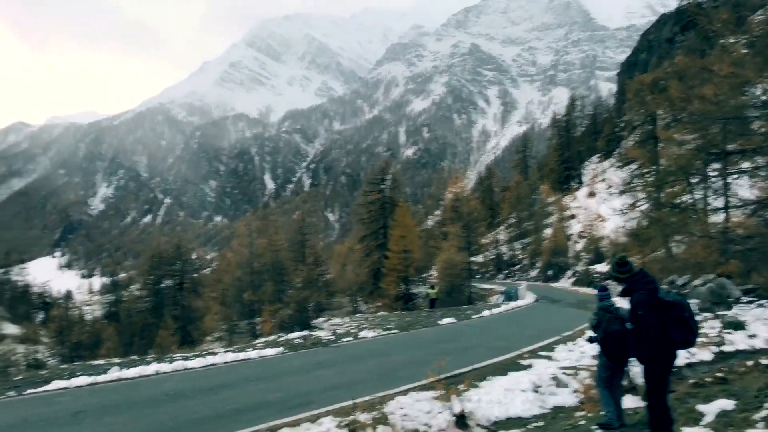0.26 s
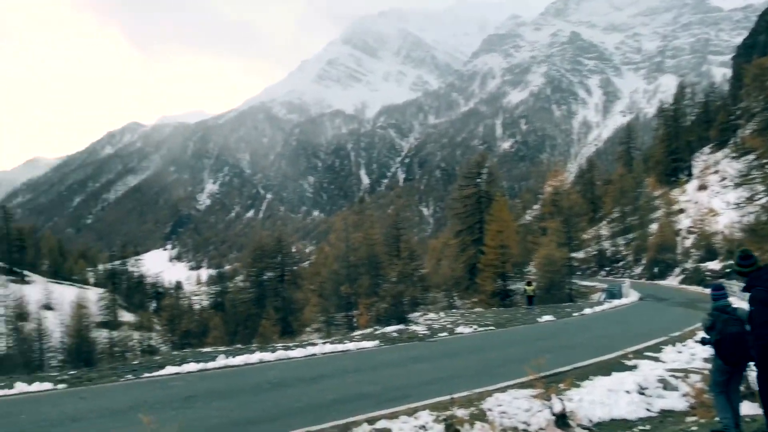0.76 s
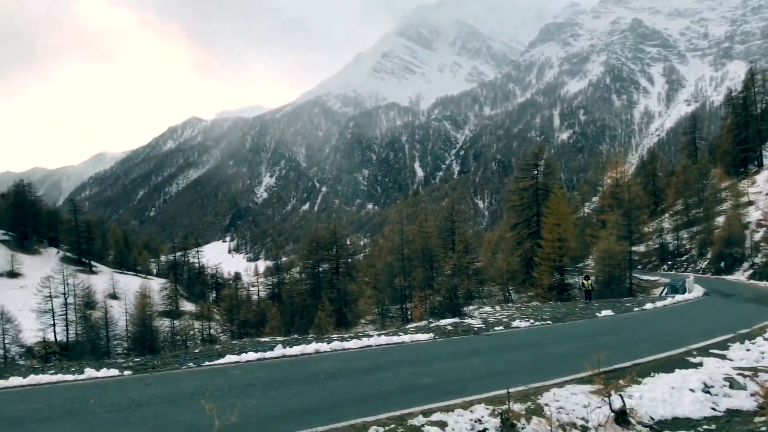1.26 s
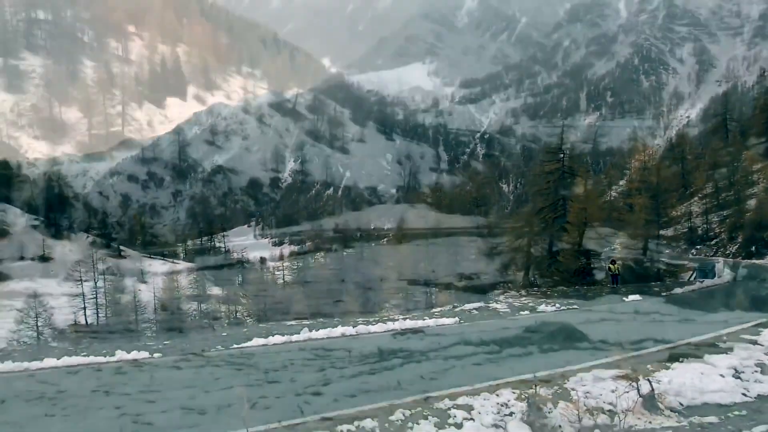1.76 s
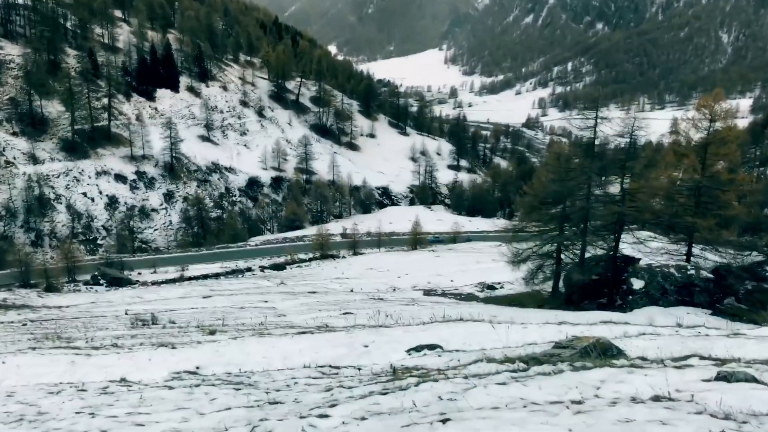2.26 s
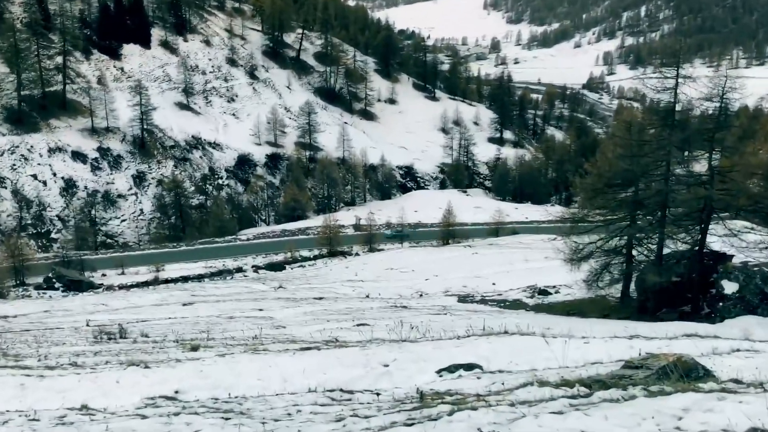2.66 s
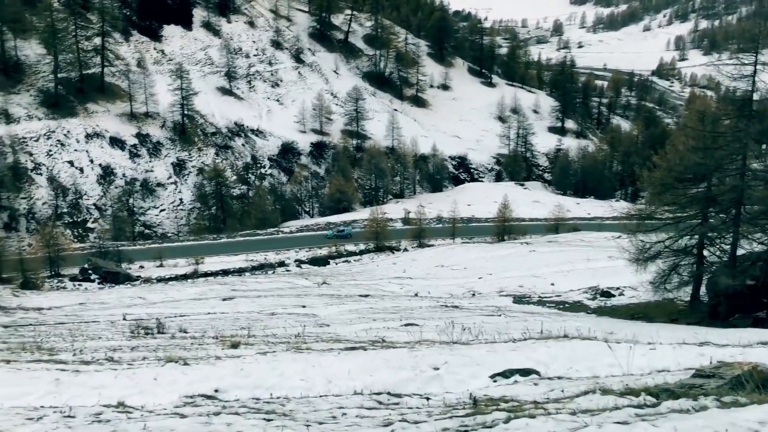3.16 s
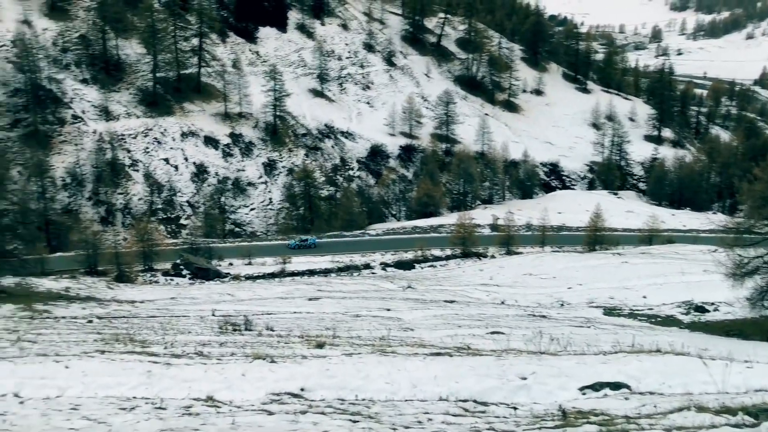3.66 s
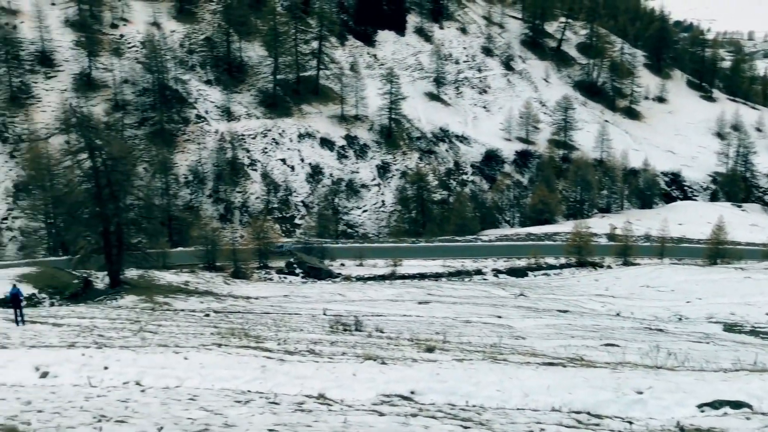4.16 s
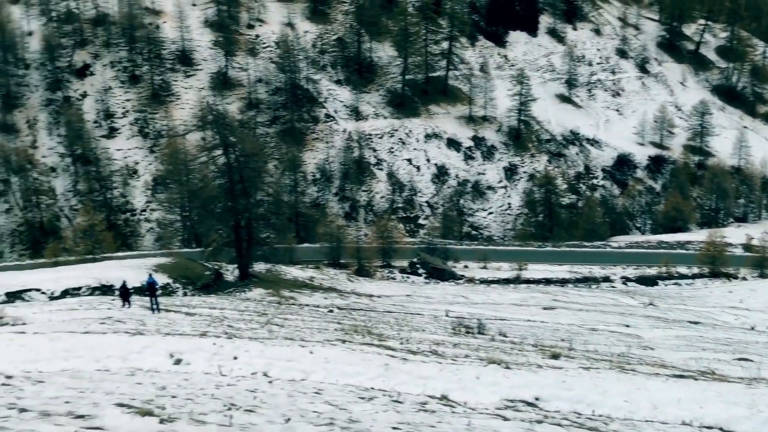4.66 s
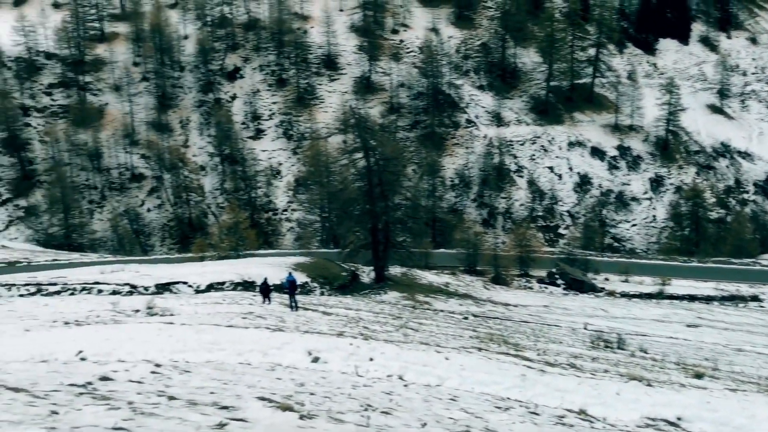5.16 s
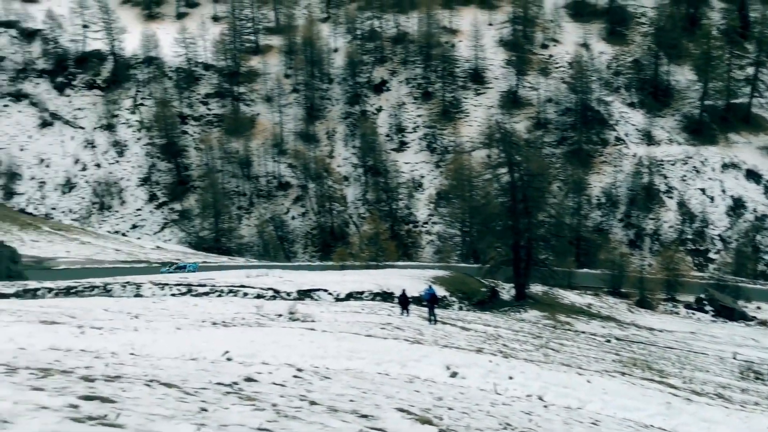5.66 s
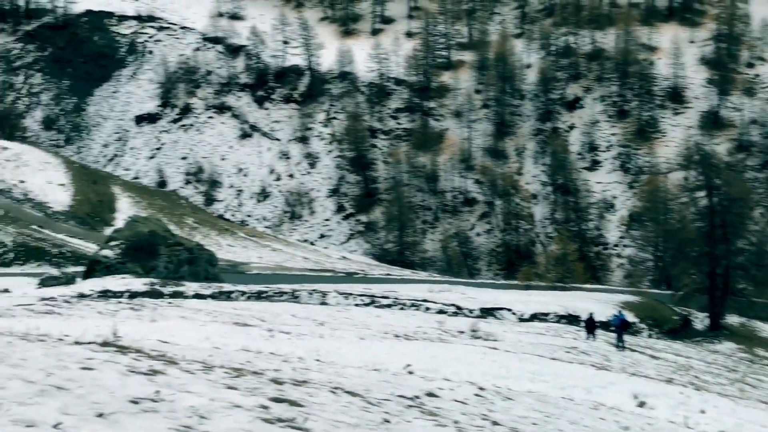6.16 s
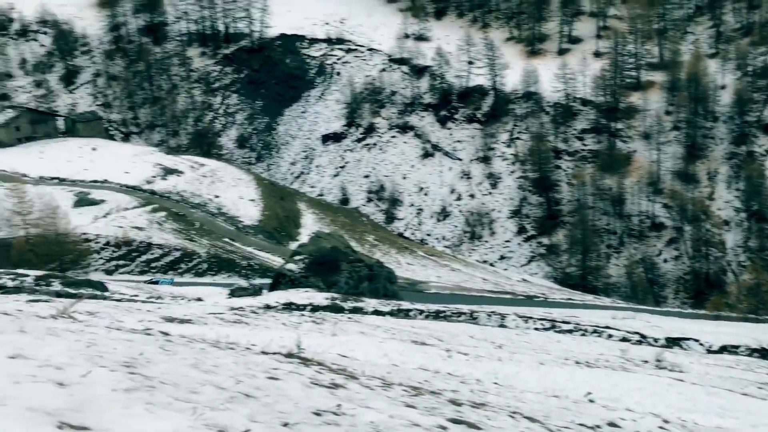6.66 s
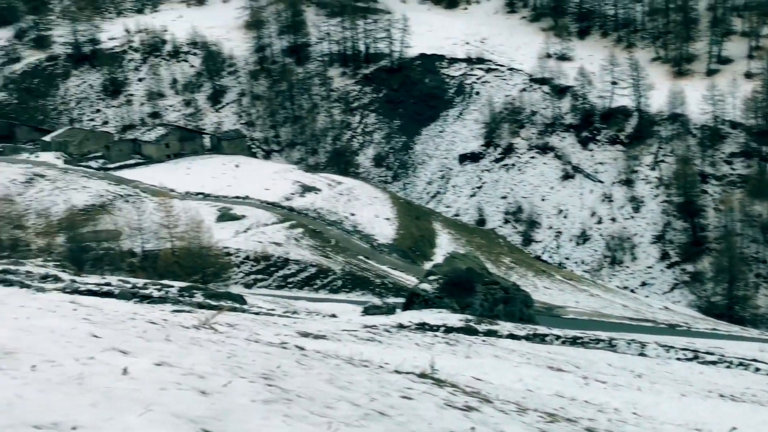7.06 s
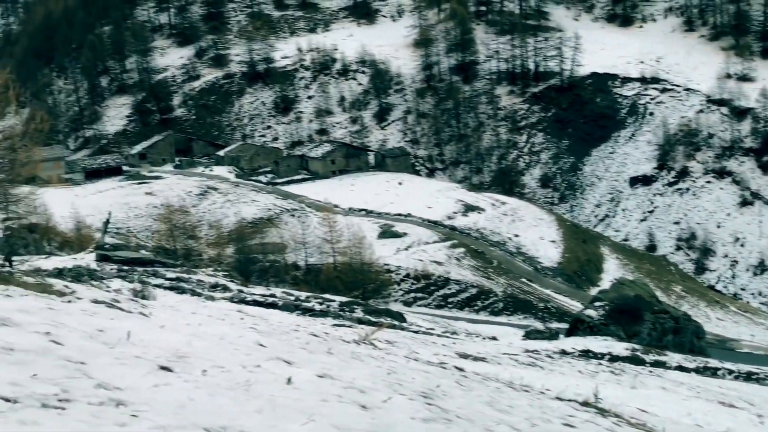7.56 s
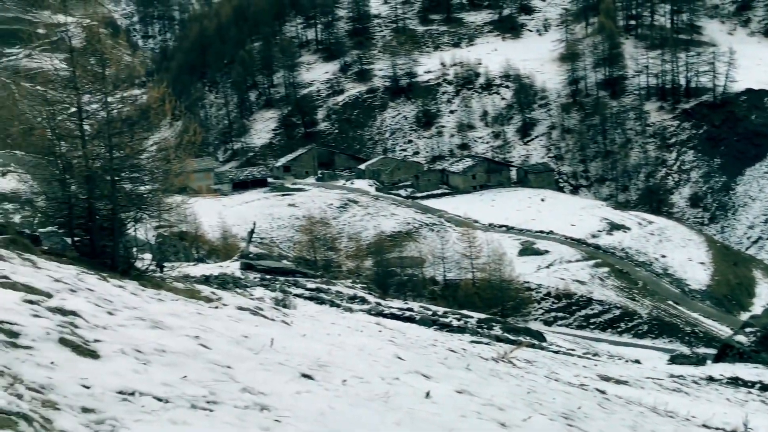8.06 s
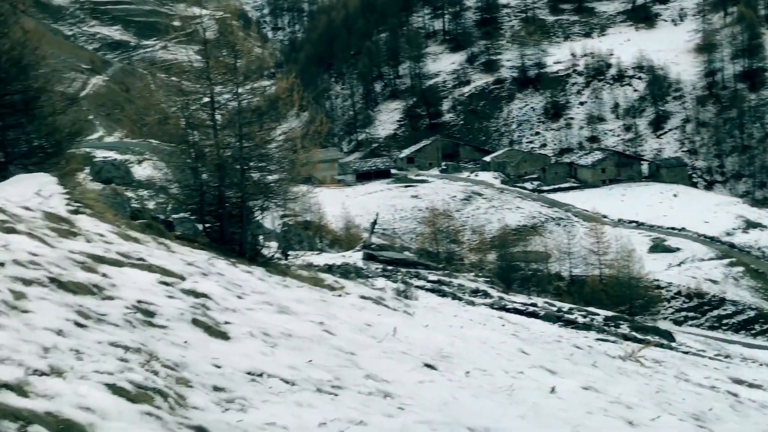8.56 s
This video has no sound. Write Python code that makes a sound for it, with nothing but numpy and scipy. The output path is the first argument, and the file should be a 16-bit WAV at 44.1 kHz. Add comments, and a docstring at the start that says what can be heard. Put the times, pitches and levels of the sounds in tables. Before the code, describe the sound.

A rally car is heard at high revs across an open mountain valley. Right at the start it shifts up with a thumping backfire and a quick drop in pitch. The raspy, buzzing note then climbs slowly at full throttle until about 6 seconds, loudest in the first two seconds, dipping, then swelling again around 4. The slopes return a blurred echo throughout, with brief clearer reflections near 5.6 and 6.7 seconds. From about 4.5 seconds come short, bright bursts of gritty crackle, and the exhaust stutters and cracks between 6 and 8. Near 6.9 seconds the pitch steps down, then keeps sinking as the car draws away until the end, just before 9. Close by, soft low foot thuds fall around 3, 7 and 8 seconds, and cloth faintly swishes from 5.5 on. A low wind rumbles underneath.

```python
"""A rally car rasps across a snowy mountain valley at full throttle, shifts up with a backfire,
then lifts off and draws away. Its note is a stack of firing orders with pulsing exhaust hiss on top.
The slopes return that note blurred and mostly lower in pitch, and single rock faces answer clearly.
Short bright bursts of gritty crackle come late on; cloth rustles and feet thud, over a low wind."""
import sys
import numpy as np
from scipy import signal
from scipy.io import wavfile
from scipy.ndimage import uniform_filter1d

SR = 44100
rng = np.random.default_rng(int(sys.argv[2]) if len(sys.argv) > 2 else 0)


def put_to_file(sound):
    """Save the sound as 16-bit audio at rate SR, in the file named by the first command-line argument."""
    columns = np.atleast_2d(sound).T  # one column per channel
    safe = np.clip(columns, -1, 1)
    whole_steps = np.round(safe * 32767)
    wavfile.write(sys.argv[1], SR, whole_steps.astype(np.int16))


N = 388080

# firing rate as heard, with one early and one late gear change: time_s, pitch_hz
FIRING_RATE = [(0.0, 234.0), (0.12, 229.2), (0.16, 198.2), (1.32, 213.5), (2.01, 222.2), (2.56, 225.5),
               (3.66, 237.5), (4.98, 246.1), (5.55, 247.3), (6.29, 247.3), (6.51, 246.1), (6.72, 241.5),
               (6.87, 240.8), (6.91, 209.6), (8.43, 193.7), (8.8, 191.7)]
PIPE_LAG_RAD = 0.12  # order k lags by this times k squared, which blunts each exhaust pulse


def amp(db):
    """Gain for a level in dB."""
    return 10 ** (np.asarray(db) / 20)


def unit_rms(x):
    """Scales to rms 1."""
    return x / np.sqrt(np.mean(x ** 2) + 1e-20)


def eq_db(curve, hz):
    """Gain of an EQ curve at hz, in straight lines on a log axis."""
    points_hz, gain_db = np.transpose(curve)
    return np.interp(np.log(hz + 1), np.log(points_hz + 1), gain_db)


def automation(rows, t):
    """Each column after a table's time column, read at the times t."""
    time_s, *columns = np.transpose(rows)
    return [np.interp(t, time_s, column) for column in columns]


def arch(t, start_s, end_s):
    """Rises from 0 to 1 and falls back between two times."""
    return np.sin(np.pi * np.clip((t - start_s) / (end_s - start_s), 0, 1))


def drift(rate_hz, step=1, poles=1):
    """Slow complex random wander of rms 1, read every step samples; more poles make it smoother."""
    coarse = rng.standard_normal((2, N // 128 + 2))
    for _ in range(poles):
        coarse = signal.lfilter([1], [1, -np.exp(-2 * np.pi * rate_hz * 128 / SR)], coarse)
    re, im = (np.interp(np.arange(0, N, step) / 128, np.arange(len(c)), unit_rms(c)) for c in coarse)
    return (re + 1j * im) / np.sqrt(2)


def moving_eq(x, db_at, size):
    """Filters by db_at(hz, time_s), with the curve held to the same power in every frame."""
    hz, time_s, spectrum = signal.stft(x, SR, nperseg=size, noverlap=size * 3 // 4)
    gain = amp(db_at(hz[:, None], time_s))
    gain = gain / np.sqrt((gain ** 2).mean(0))
    return signal.istft(spectrum * gain, SR, nperseg=size, noverlap=size * 3 // 4)[1][:N]


def coloured_noise(curve, size):
    """Noise through a steady EQ curve, at rms 1."""
    return unit_rms(moving_eq(rng.standard_normal(N), lambda hz, _: eq_db(curve, hz), size))


def wind(t):
    """Wind buffets in a lumpy low rumble."""
    # rumble spectrum: freq_hz, gain_db
    colour = [(25, -28), (45, -2), (60, -1), (160, 2), (230, -25), (400, -73.5)]
    # slow rise and fall of the wind: time_s, level_db
    gusts = [(0, -44.5), (2, -49), (3.5, -45.5), (5, -49), (7.8, -43.5), (8.8, -46.5)]
    rumble = coloured_noise(colour, size=4096)
    return amp(automation(gusts, t)[0] + 2.8 * drift(5.3).real) * rumble


def cloth_rustle(t):
    """Cloth slides in short, airy swishes."""
    # friction spectrum: freq_hz, gain_db
    colour = [(3000, -37), (7000, -7), (10500, -10.5), (12500, -7.5), (16000, -12)]
    # slides of the cloth: peak_s, level_db, length_s
    slides = [(5.533, -53, 0.057), (6.01, -54, 0.18), (6.202, -58.5, 0.17), (6.564, -57.5, 0.13),
              (6.937, -53, 0.088), (7.375, -60, 0.31), (8.37, -61, 0.11), (8.498, -50.5, 0.045),
              (8.8, -57, 0.086)]
    envelope = sum(amp(db - 11.5 * abs(t - peak_s) / length_s) for peak_s, db, length_s in slides)
    return envelope * amp(3.3 * drift(14).real) * coloured_noise(colour, size=256)


def gritty_crackle(t):
    """Short bright bursts of uneven clicks and fine hiss, like exhaust rasp or crunching snow."""
    # spectrum of the crackle: freq_hz, gain_db
    colour = [(1500, -52), (3000, 5.5), (3500, 8.5), (4500, 7), (4900, -0.5), (6200, 0), (8000, -8.5),
              (10500, -20.5), (12000, -49)]
    # bursts of crackle: peak_s, level_db, length_s
    bursts = [(4.512, -38.5, 0.055), (5.023, -42.5, 0.12), (5.55, -50, 0.056), (6.289, -40.5, 0.11),
              (6.536, -31, 0.055), (6.876, -50, 0.055), (7.238, -41.5, 0.021), (7.822, -52, 0.13),
              (8.64, -51, 0.095)]
    # faint crackle between the bursts: time_s, level_db
    bed = [(4.3, -77), (5.2, -49), (6.3, -44), (6.6, -92), (7.0, -54.5), (7.8, -59), (8.2, -64), (8.8, -75)]
    rise_db, fall_db = 8.5, 12  # per burst length, before and after the peak
    envelope = amp(automation(bed, t)[0])
    for peak_s, db, length_s in bursts:
        envelope += amp(db - np.maximum(rise_db * (peak_s - t), fall_db * (t - peak_s)) / length_s)
    fade_in = np.clip((t - bed[0][0]) / 0.22, 0, 1)
    sizes = amp(4 * np.minimum(rng.exponential(1, N), 3.5))
    onsets = rng.random(N) < 1200 / SR  # about 1200 a second
    clicks = unit_rms(sizes * onsets * rng.choice([-1., 1.], N))
    click_gain = np.clip((t - 6.4) / 0.5, 0.2, 1)  # the clicks rise out of the hiss late on
    grit = click_gain * clicks + 0.39 * rng.standard_normal(N)
    crackle = unit_rms(moving_eq(grit, lambda hz, _: eq_db(colour, hz), size=256))
    return fade_in * envelope * amp(2 * drift(23).real) * crackle


def foot_thuds(t):
    """Heels push the ground: low thumps that die within a few cycles."""
    # footfalls: start_s, level_db, pitch_hz
    footfalls = [(2.78, -26, 71), (3.038, -33, 72), (3.17, -36, 80), (6.87, -35, 70), (7.198, -39, 80.5),
                 (7.842, -31, 75)]
    out = np.zeros(N)
    for start_s, level_db, pitch_hz in footfalls:
        cycles = t[:SR // 4] * pitch_hz
        thud = np.e * cycles * np.exp(-1.3 * cycles) * np.sin(2 * np.pi * cycles)
        out[round(start_s * SR):][:len(thud)] += amp(level_db) * thud
    return out


def slope_echo(t):
    """Many echo paths, each shifted by its angle to the road, smear every order into a noise band."""
    # the wash off the slopes: time_s, pitch_hz, level_db, pitch_spread_ratio, lows_db
    wash = [(0, 246, -20.5, 0.1, 0.5), (.3, 226, -28, 0.25, 2), (1.8, 229, -32.5, 0.18, -3),
            (1.95, 195.4, -32.5, 0.09, 5), (2.5, 192, -31, 0.069, -0.5), (3.2, 202, -28, 0.021, 1),
            (4, 204.6, -29, 0.086, -2.5), (5.2, 232.2, -26.5, 0.088, -12), (5.5, 227.7, -28, 0.033, -2.5),
            (5.9, 228, -28, 0.099, -3), (6.3, 231.5, -29, 0.055, 6.5), (7.2, 228.4, -30.5, 0.1, 1.5),
            (8.15, 227, -32.5, 0.12, 4.5), (8.3, 231.5, -38, 0.21, 2)]
    # overall tone of the wash: freq_hz, gain_db
    colour = [(60, -26), (150, -28), (220, 7), (420, 7), (650, 5.5), (900, 1.5), (1400, -1.5),
              (2200, -16.5), (4000, -50.5), (9000, -95)]

    def bands_db(hz, time_s):
        pitch_hz, _, spread, lows_db = automation(wash, time_s)
        k = np.maximum(np.round(hz / pitch_hz), 1)  # nearest order
        comb = np.exp(-((hz / (k * pitch_hz) - 1) / spread) ** 2) / k ** 0.52 + 0.051 + 0.021 * k
        # single faces of rock flash up as narrow, lingering streaks; broad patches come and go a little faster
        # and more weakly
        scatter = rng.standard_normal((len(time_s), len(hz)))
        streaks = uniform_filter1d(uniform_filter1d(scatter, size=14, axis=0), size=2, axis=1).T
        patches = uniform_filter1d(uniform_filter1d(scatter, size=8, axis=0), size=16, axis=1).T
        flicker_db = 2.56 * unit_rms(streaks) + 1.8 * unit_rms(patches)
        return eq_db(colour, hz) + lows_db * (hz < 320) + 20 * np.log10(comb) + flicker_db

    sputter_db = 1.4 * np.clip((t - 6.6) / 0.3, 0, 1) * drift(7).real  # uneven firing comes back too
    bands = unit_rms(moving_eq(rng.standard_normal(N), bands_db, size=2048))
    return amp(automation(wash, t)[1] + sputter_db) * bands


def rock_face_echoes(t):
    """A rock face throws back orders 2-5 as a brief clear note while the car crosses its line."""
    # single reflections: start_s, end_s, pitch_hz, level_db
    faces = [(5.512, 5.75, 219.8, -25), (6.66, 6.837, 254, -31.5)]
    out = np.zeros(N)
    for start_s, end_s, pitch_hz, level_db in faces:
        envelope = amp(level_db) * arch(t, start_s, end_s)
        for k in range(2, 6):
            partial = (1 + 0.5 * drift(2.2)) * np.exp(2j * np.pi * k * pitch_hz * t)
            out += envelope * partial.real / (k - 1)
    return out


def backfire(t):
    """Unburnt fuel goes off while the ignition is cut for the first upshift, and the pipe thumps."""
    # envelope of the blast: start_s, rise_s, t60_s
    timing = (.06, .035, .22)
    # blast spectrum: freq_hz, gain_db
    colour = [(25, -34), (50, -4), (300, -8.5), (1200, -14.5), (4000, -23), (11000, -46.5), (16000, -87)]
    start_s, rise_s, t60_s = timing
    age_s = t - start_s
    envelope = np.clip(age_s / rise_s, 0, 1) * amp(-60 * np.maximum(age_s - rise_s, 0) / t60_s)
    blast = envelope * coloured_noise(colour, size=1024)
    cycles = np.maximum(age_s - rise_s / 2, 0) * 115  # the pipe rings at 115 Hz
    thump = cycles * np.exp(-0.3 * cycles) * np.sin(2 * np.pi * cycles)
    return amp(-20) * blast + amp(-25.5) * thump


def exhaust_cracks(t, firings):
    """In short bursts each firing cracks through in one band, uneven in size, in step with the orders."""
    # bursts of cracking: start_s, end_s, centre_hz, width_hz, level_db
    bursts = [(2.79, 2.95, 2880, 1400, -45.5), (6.084, 6.251, 2830, 502, -39.5),
              (6.256, 6.41, 2900, 500, -38), (6.403, 6.6, 2960, 500, -36.5), (6.403, 6.6, 1350, 300, -38),
              (6.684, 6.8, 1050, 400, -45), (7.087, 7.326, 1740, 650, -33), (7.195, 7.301, 3930, 700, -40),
              (7.63, 7.74, 1500, 600, -43), (7.745, 7.86, 3900, 700, -40.5), (7.77, 7.844, 1800, 900, -43),
              (7.917, 7.98, 1500, 600, -43)]
    sizes = amp(4 * np.sqrt(2) * drift(25).real)  # 4 dB of spread over a few firings
    pulse_s = np.arange(-128, 129) / SR
    out = np.zeros(N)
    for start_s, end_s, centre_hz, width_hz, level_db in bursts:
        span = slice(round(start_s * SR), round(end_s * SR))
        k = centre_hz / automation(FIRING_RATE, (start_s + end_s) / 2)[0]
        fired = np.diff(np.floor(firings[span] - PIPE_LAG_RAD * k / np.pi), append=np.inf) == 1
        window = np.exp(-(np.pi * width_hz * pulse_s) ** 2)
        pulse = -window * np.cos(2 * np.pi * centre_hz * pulse_s + PIPE_LAG_RAD * k ** 2)
        rattle = unit_rms(signal.oaconvolve(fired * sizes[span], pulse, "same"))
        out[span] += amp(level_db) * arch(t[span], start_s, end_s) * rattle
    return out


def exhaust_hiss(firings):
    """Each firing puffs gas hiss that gathers near the orders; scaled to rms 1 around 3 kHz."""
    # rasp spectrum: freq_hz, gain_db
    colour = [(900, -4.5), (1300, 9), (1900, 7), (2600, 0), (3100, 0.5), (4000, -7.5), (5700, -16),
              (8600, -39.5), (10500, -63), (16000, -100)]

    def rasp_db(hz, time_s):
        return eq_db(colour, hz) + 4 * np.cos(2 * np.pi * hz / automation(FIRING_RATE, time_s)[0])

    gate = 0.5 + np.exp(-(firings % 1) / 0.03)
    hiss = moving_eq(gate * rng.standard_normal(N), rasp_db, size=1024)
    presence = signal.butter(4, [2300, 3500], "bandpass", fs=SR, output="sos")
    return hiss / signal.sosfilt(presence, hiss).std()


def exhaust_note(t, firings, control_s, gains):
    """Firing orders as tones that twinkle in moving air; unequal cylinders add a weak half order."""
    likeness = 0.42  # between the twinkle of neighbouring orders
    air = [drift(9, step=64, poles=2)]
    for _ in gains:
        air.append(likeness * air[-1] + np.sqrt(1 - likeness ** 2) * drift(9, step=64, poles=2))

    def tone(k, gain, twinkle):
        wobble = (1 + twinkle * air[int(k)]) / np.sqrt(1 + twinkle ** 2)
        phase = 2 * np.pi * k * firings - PIPE_LAG_RAD * k ** 2
        return -np.sqrt(2) * (np.interp(t, control_s, gain * wobble) * np.exp(1j * phase)).real

    note = sum(tone(k, gain, twinkle=0.16 + 0.06 * k) for k, gain in enumerate(gains, 1))
    return note + amp(-26.5) * tone(0.5, gains[0], twinkle=0.84)


def order_balance_db(k, time_s, facing):
    """Weight of order k: a blend of the balance from behind and from the flank, with single orders that stand
    out or sink for a while."""
    # orders 1-15 with the tailpipe towards the listener (facing 1): gain_db
    behind = [5.5, -6.5, -13, -10.5, -3.5, -15.5, -17, -23.5, -30.5, -27, -30.5, -43.5, -44, -51, -60]
    # orders 1-15 from the flank, across snow (facing 0): gain_db
    flank = [-13.5, 9.5, 0.2, 5.5, 2.2, 4, -16.5, -10, -16, -34.5, -37.5, -32, -44.5, -48.5, -48.5]
    # one order stands out or sinks for a while: start_s, end_s, order, gain_db
    lifts = [(0.3, .85, 6., 10), (0.3, 0.7, 9., 14), (.6, 1.08, 3., 3.5), (1.04, 1.21, 2., -6.5),
             (0.98, 1.34, 3., -7.5), (1.22, 1.62, 3., 7), (0.75, 0.89, 8., 10), (1.5, 1.86, 4., 12.5),
             (1.5, 2, 9., 7), (1.6, 2.24, 9., 13), (1.2, 1.7, 7., 7), (1.7, 3.2, 4., 7.5),
             (2.7, 2.5, 7., 9), (3.05, 4.26, 3., 5), (3.18, 3.61, 5., 12), (4.57, 4.96, 3., 5),
             (3.75, 4, 4., -17), (3.6, 4, 9., 14.5), (4.4, 4.7, 1., 6), (4.3, 4.7, 2., -3.5),
             (4.2, 7.9, 7., 4), (5.1, 5.45, 6., 7.5), (5.94, 6.62, 6., 3.5), (5.3, 6.4, 3., -12),
             (6.1, 6.4, 3., -8), (6.3, 6.9, 10., 8.5), (6, 7.13, 3., 8.5), (6.8, 7.18, 4., 8),
             (7.75, 8.1, 3., 6.5), (8.3, 8.8, 3., 7), (7.82, 10.3, 4., 3), (8.3, 8.66, 2., 3.5)]
    lift_db = sum(db * np.sqrt(arch(time_s, start_s, end_s))
                  for start_s, end_s, order, db in lifts if round(order) == k)
    return facing * behind[k - 1] + (1 - facing) * flank[k - 1] + lift_db


def snow_bounce(k, firing_hz, lag_ms):
    """Gain of order k under the inverted echo off the snow, which cancels some orders."""
    echo = np.exp(-0.062 * (k - 1))  # weaker for the higher orders
    phase = 2 * np.pi * k * firing_hz * lag_ms / 1000
    return np.sqrt(abs(1 + echo ** 2 - 2 * echo * np.cos(phase))) / (1 + echo)


def engine(t):
    """One train of firings drives the exhaust's note, hiss and cracks."""
    # the car along the road: time_s, gain_db, facing_ratio, bounce_lag_ms, tilt_db_per_order, hiss_db
    drive = [(0.0, -20, 0.96, 0.16, -0.1, -36), (0.13, -29.5, 1, 1.53, 0.5, -38.5),
             (0.2, -14, 0.62, 0.49, -4, -42), (0.45, -17.5, 0.76, 0.86, -1, -40),
             (0.7, -19, 0.97, 0.89, -1, -41.5), (0.95, -23.5, 0.48, 0.98, -0.5, -45),
             (1.3, -21, 0.83, 1.05, -1, -43.5), (1.58, -16, 0.68, 1.27, -3.5, -44),
             (1.88, -22.5, 0.91, 0.96, -0.58, -44.5), (2.03, -33, 1.2, 0.83, 0.85, -49.5),
             (2.25, -40, 0.5, 0.89, 2, -51), (2.85, -33.5, 0.52, 0.6, 1, -51),
             (3.4, -39, 0.1, 0.83, 0.16, -49), (3.45, -30, 0.22, 0.92, 0.25, -43.5),
             (3.8, -24.5, 0.42, 0.89, -0.5, -45.5), (4.3, -27, 0.35, 0.82, 0.67, -46),
             (4.85, -28.5, 0.23, 0.77, 0.5, -40.5), (5.1, -37, 0.09, 0.56, 1.22, -42),
             (5.4, -35.5, 0.61, 0.56, 1.34, -43), (5.7, -36.5, 0.72, 0.66, 1.26, -45),
             (6.1, -37.5, 0.46, 0.59, 2, -43.5), (6.55, -36.5, 0.77, 0.38, 3, -38.5),
             (6.65, -30.5, 0.57, 0.2, 0, -48.5), (6.95, -43.5, 0.8, 0.85, 2.5, -48.5),
             (7.5, -36.5, 0.86, 1.08, 1.66, -44), (8.1, -36.5, 0.86, 1.05, 1.3, -45.5),
             (8.8, -36, 1, 1, 2, -46.5)]
    # the note swells or dips briefly, the treble most: centre_s, half_width_s, gain_db
    swells = [(.082, 0.047, 5), (1.0, 0.063, 2.5), (2.37, 0.043, 1.5), (2.67, 0.038, -4),
              (3.475, 0.047, 2.5), (3.7, 0.046, -4), (4.11, 0.036, 3), (4.31, 0.037, -3.5),
              (4.49, 0.078, 2), (4.99, 0.086, 3), (5.54, 0.03, 3), (6.15, .06, 2), (6.63, 0.043, -9),
              (7.119, 0.013, 3.5), (7.8, 0.028, 0.5)]
    control_s = t[::64]
    gain_db, facing, lag_ms, tilt_db, hiss_db = automation(drive, control_s)
    firing_hz = automation(FIRING_RATE, control_s)[0]
    swell_db = sum(db * np.exp(-((control_s - centre_s) / half_width_s) ** 2)
                   for centre_s, half_width_s, db in swells)
    gains = []
    for k in range(1, 16):
        order_db = gain_db + order_balance_db(k, control_s, facing) + tilt_db * (k - 1)
        order_db += swell_db * (1 + 0.06 * (k + 1))
        gains.append(amp(order_db) * snow_bounce(k, firing_hz, lag_ms))

    jitter = 1 + 0.0013 * drift(17).real
    firings = np.cumsum(automation(FIRING_RATE, t)[0] * jitter) / SR  # running count
    note = exhaust_note(t, firings, control_s, gains)
    hiss = exhaust_hiss(firings)
    # the note grows uneven late in the full-throttle run and keeps stuttering as the car draws away
    stutter = amp(2.45 * np.clip((t - 5.3) / 1.5, 0, 1) * drift(14).real)
    cracks = exhaust_cracks(t, firings)
    hiss_gain = amp(np.interp(t, control_s, hiss_db + swell_db) + 2 * drift(6.4).real)
    return stutter * note + stutter ** 2 * hiss_gain * hiss + cracks


def scene():
    """Car, valley, small noises and wind, mixed in mono."""
    t = np.arange(N) / SR
    car_in_valley = engine(t) + slope_echo(t) + rock_face_echoes(t) + backfire(t)
    small_noises = gritty_crackle(t) + cloth_rustle(t) + foot_thuds(t)
    return (car_in_valley + small_noises + wind(t))[None]


def record(dry):
    """A steep low-pass trims the air above 15.75 kHz."""
    lowpass = signal.firwin(1023, 15750, window=("kaiser", 10), fs=SR)
    return signal.oaconvolve(dry, lowpass[None], "same")


dry = scene()
out = record(dry)
put_to_file(out)
```